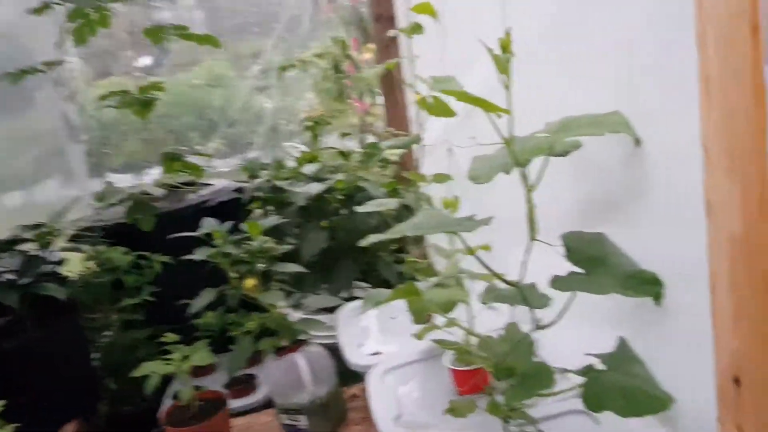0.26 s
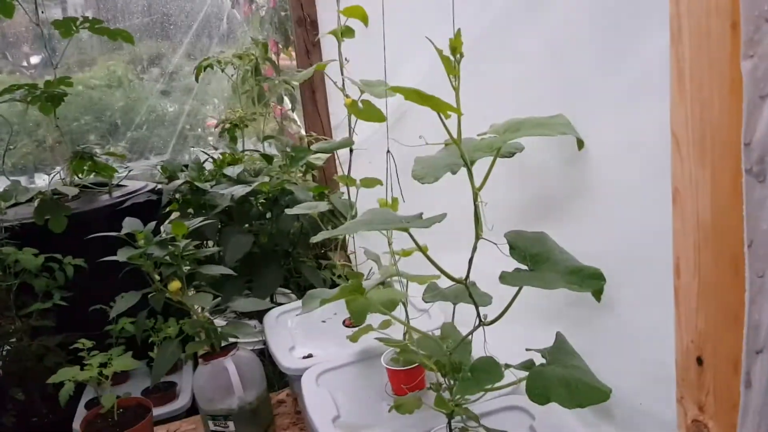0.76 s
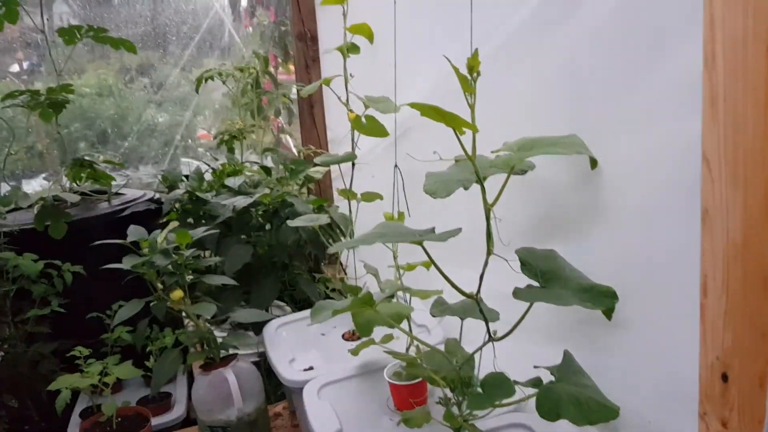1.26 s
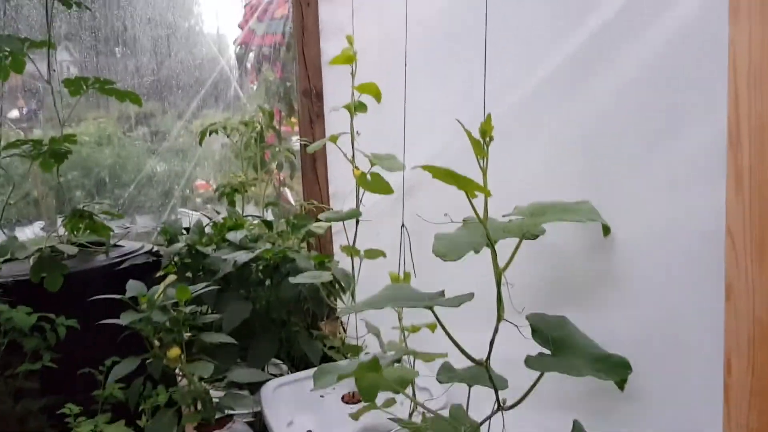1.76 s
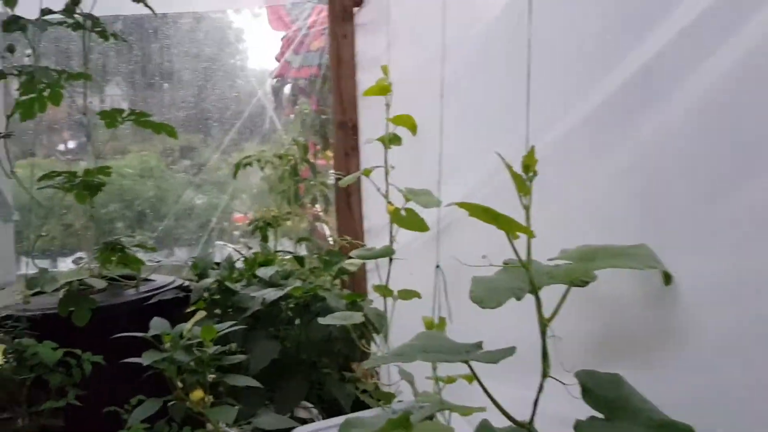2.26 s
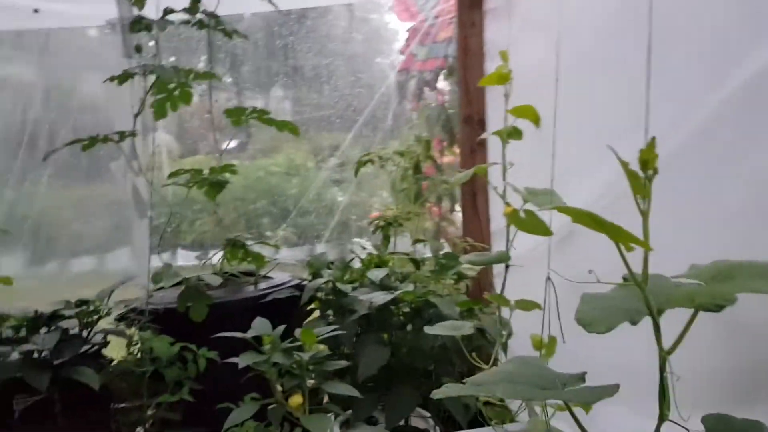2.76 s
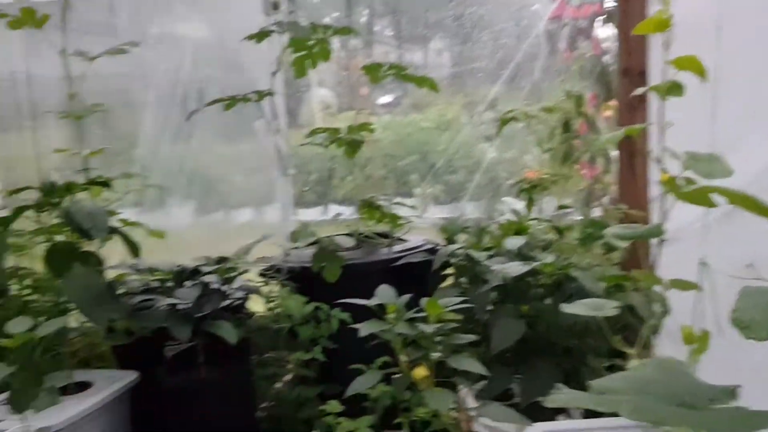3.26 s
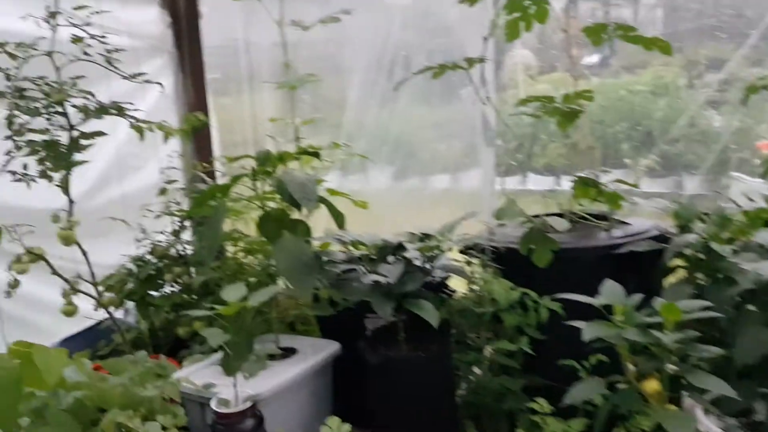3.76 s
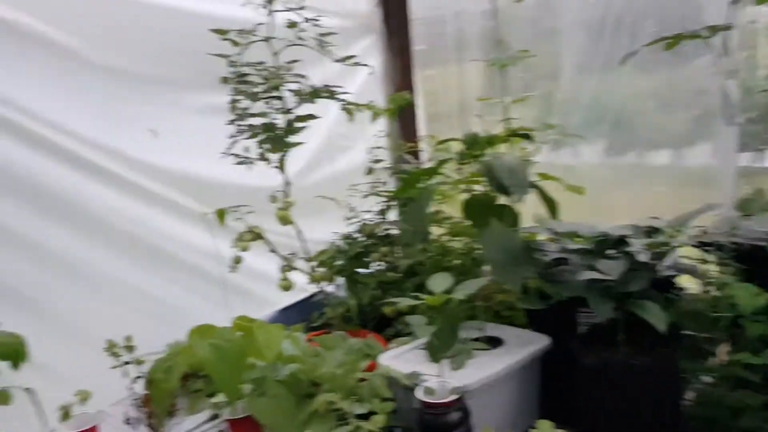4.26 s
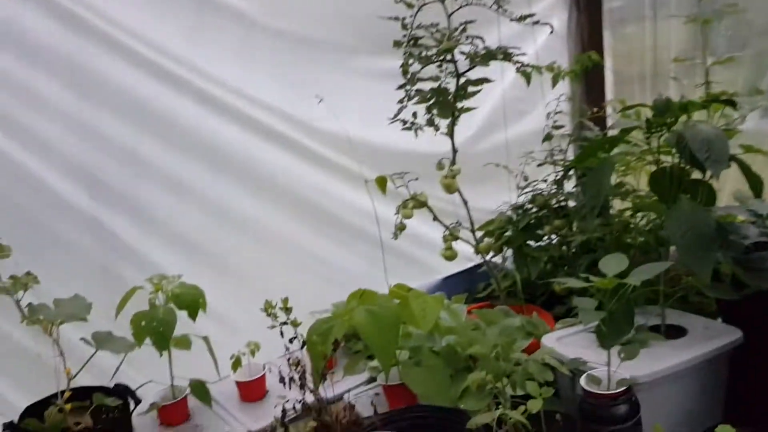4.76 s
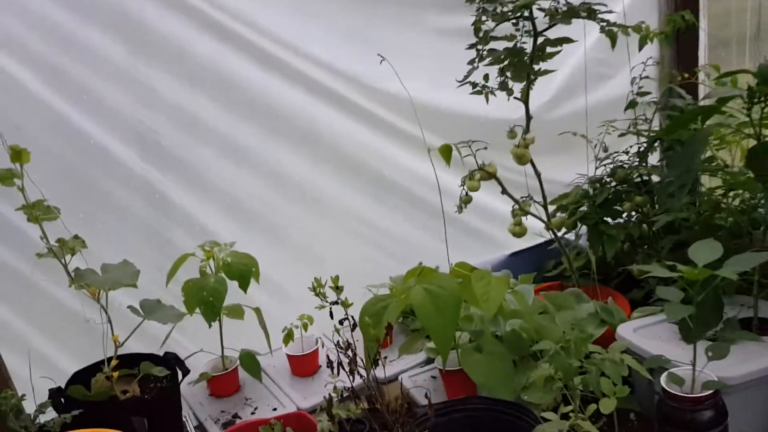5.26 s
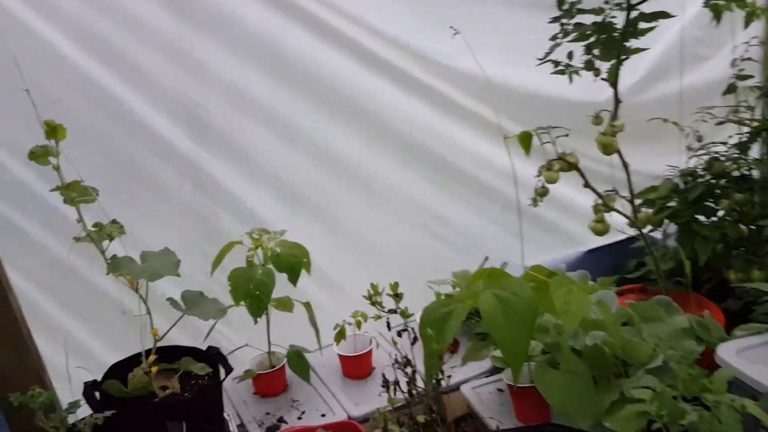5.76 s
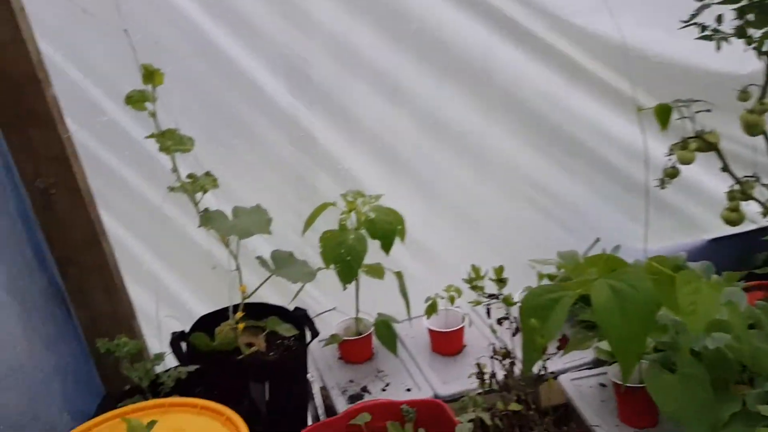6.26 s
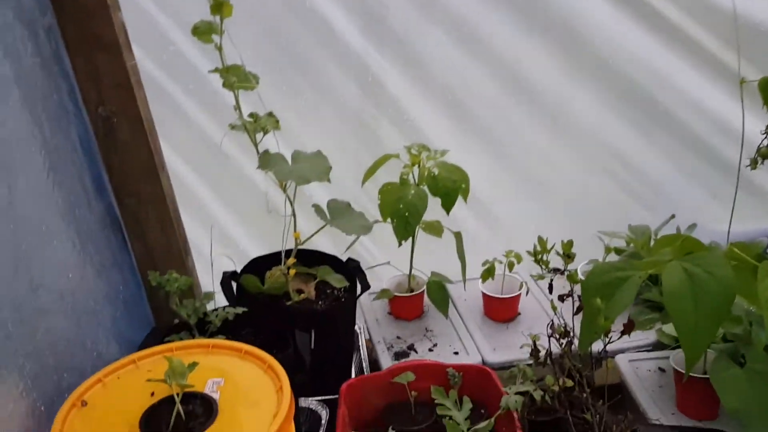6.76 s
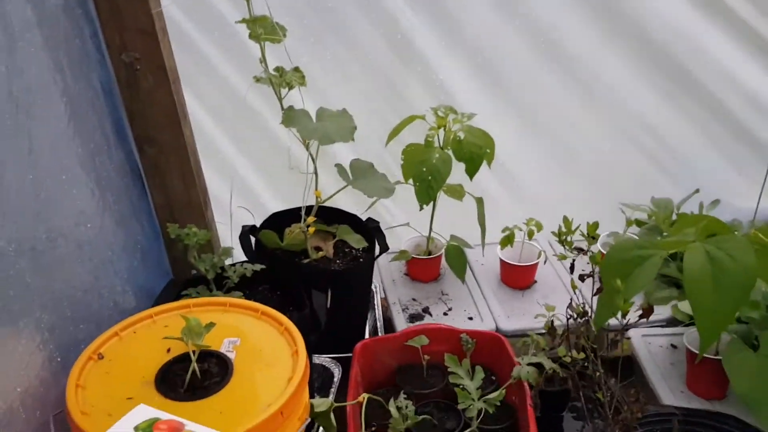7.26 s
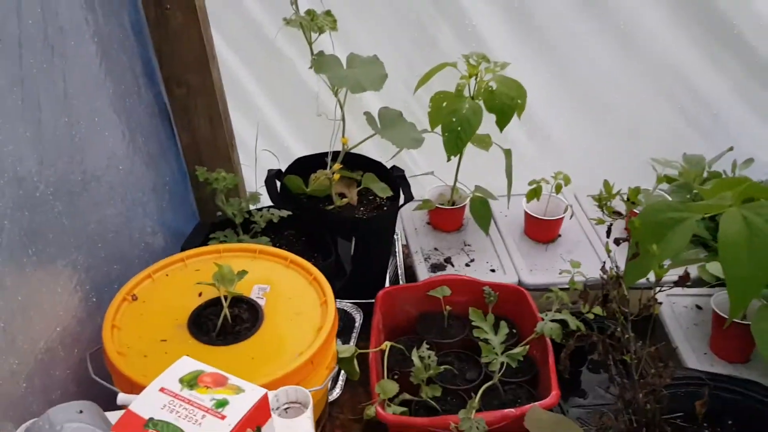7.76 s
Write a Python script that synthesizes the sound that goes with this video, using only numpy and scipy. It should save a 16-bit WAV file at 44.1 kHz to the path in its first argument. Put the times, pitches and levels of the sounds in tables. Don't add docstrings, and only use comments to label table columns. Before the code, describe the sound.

Rain on a small plastic greenhouse, heard inside through a handheld stereo microphone. From 0 s there is continuous soft hiss, fine patter and faint low drumming of the structure, with scattered dry taps. Heavier drops slap the taut sheet at about 1.4 and 2.1 s, each with a short rattling ring. At 2.9 s a sharp double knock hits the housing on the left; from 3.1 to 3.7 s a finger drags over the right side in rapid low, fluttering thuds, then more bumps and a second flutter until about 4.1 s, while strong drops strike at 3.6 and 4.0 s. A quick soft trickle falls at 4.3 s, followed by a dense cluster of bright taps around 4.65 s. Crisp ticks, plips and wet splats continue, with a strong slap at 5.4 s. Small handling clicks come at 6.3 s and 7.1-7.9 s as the tapping thickens to the end at about 8 s.

```python
import sys
import numpy as np
from scipy import signal
from scipy.fft import rfft, irfft, next_fast_len
from scipy.io import wavfile
from scipy.ndimage import uniform_filter1d, map_coordinates

SR = 44100
rng = np.random.default_rng(int(sys.argv[2]) if len(sys.argv) > 2 else 0)


def to_wav(sig):
    pcm = np.clip(np.atleast_2d(sig), -1, 1) * 32767
    pcm = np.round(pcm).astype(np.int16)
    wavfile.write(sys.argv[1], SR, pcm.T)


def natural_amplitude(level_db):
    exponent = np.asarray(level_db, float) / 20
    return 10 ** exponent


N = 352894

# start in seconds, hiss in dB, extra treble in dB, rumble in dB.
SHOWER_LEVELS = [(0.0, -46.5, 8, -47.5), (1.65, -47, 6.5, -49.5), (2.3, -47.5, 7.5, -50),
                 (2.6, -48, 8, -53), (2.9, -46, 10, -49.5), (3.35, -51.5, 8, -47), (3.55, -41.5, 2, -52),
                 (3.85, -43.5, 2.5, -50), (4.21, -45.5, 0, -49), (4.5, -46, 2.5, -50),
                 (5.3, -44, 4.5, -48.5), (5.7, -46, 8, -47), (5.95, -46, 10, -50), (6.3, -46, 8, -46.5),
                 (6.9, -47, 11.5, -48), (7.45, -44, 9, -49), (8.0, -43.5, 6.5, -53)]
TAP_CRISP_DB, TICK_CRISP_DB = 3, 5


def unit(x):
    return x / np.sqrt(np.mean(x ** 2) + 1e-20)


def along(points, hz):
    f, v = np.transpose(points)
    return np.interp(np.log(hz + 1), np.log(f + 1), v)


def curves(rows):
    s, *cols = np.transpose(rows)
    return [np.interp(np.arange(N) / SR, s, c) for c in cols]


def wobble(rate):
    knots = rng.standard_normal(int(N * rate / SR) + 4)
    return map_coordinates(knots, [np.arange(N) * rate / SR])


def filtered(x, response):
    m = next_fast_len(N + 8192)
    return irfft(rfft(x, m) * response(np.fft.rfftfreq(m, 1 / SR)), m)[..., :N]


def low(f, hz):
    return 1 / (1 + 1j * f / hz)


def high(f, hz, q=0.7):
    return -f * f / (hz * hz - f * f + 1j * f * hz / q)


def causal(*spectra):
    hz = np.fft.rfftfreq(2048, 1 / SR)
    cepstrum = irfft(np.log(natural_amplitude(sum(along(points, hz) for points in spectra))))
    cepstrum[1:1024] *= 2
    cepstrum[1025:] = 0
    return irfft(np.exp(rfft(cepstrum)))[:1024]


def rush(patchy_db):
    # frequency in Hz, left-right likeness from 0 to 1.
    likeness = [(60, 0.91), (300, 0.8), (700, 0.27), (1400, 0.0052), (16000, .01)]
    z = signal.stft(rng.standard_normal((2, N)), nperseg=512)[2]
    field = rng.standard_normal(z.shape[1:])
    field = uniform_filter1d(uniform_filter1d(field, size=8, axis=0), size=8, axis=1)
    pair = signal.istft(z * natural_amplitude(patchy_db * unit(field)), nperseg=512)[1][:, :N]

    def mid_side(hz):
        angle = np.arccos(np.clip(along(likeness, hz), -1, 1)) / 2
        return np.array([np.cos(angle), np.sin(angle)])

    mid, side = filtered(pair, mid_side)
    return unit(np.array([mid + side, mid - side]))


def rumble():
    # frequency in Hz, level in dB.
    drumming_colour = [(15, -40), (30, -25), (42, -4.5), (54, -1.5), (124, -3.5), (166, -10), (300, -17),
                       (390, -21.5), (660, -120)]
    level_db = curves(SHOWER_LEVELS)[2] - 0.5 + 0.75 * wobble(4.3)
    return natural_amplitude(level_db) * unit(filtered(rush(patchy_db=1.5), lambda f: natural_amplitude(along(drumming_colour, f))))


def patter(count, spread_db):
    out = np.zeros((2, N))
    for pan, splash, pitch, chance in rng.standard_normal((10, 4)):
        hits = np.zeros(N)
        places = rng.integers(0, N, count)
        hits[places] = natural_amplitude(spread_db * np.minimum(rng.exponential(size=count), 2.8))
        one = drop(-24, 3 * pan, splash_db=-9 + 4 * splash, thud_db=-13.5, hz=1300 * np.exp(0.42 * pitch),
                   crisp_db=TAP_CRISP_DB, chance=chance)
        out += signal.fftconvolve(hits[None], one, axes=1)[:, :N]
    return unit(out)


def shower():
    hiss_db, treble_db, _ = curves(SHOWER_LEVELS)
    swell = natural_amplitude(0.9 * wobble(11))
    rain = natural_amplitude(1) * rush(patchy_db=2.0) + natural_amplitude(-0.23) * patter(count=230, spread_db=4.0)
    treble = filtered(rain, lambda f: abs(high(f, 10240)) ** 2)
    rain = rain + (natural_amplitude(treble_db) - 1) * treble
    return natural_amplitude(hiss_db + 8.5) * swell * rain


def finger():
    # start in seconds, push in dB, click in dB over the push.
    slips = [(3.112, -34, -17), (3.1228, -31, -20), (3.1354, -27, -14), (3.1498, -28, -26),
             (3.1696, -26, -26), (3.1974, -27, -18), (3.2156, -24, -26), (3.2324, -25, -26),
             (3.2494, -23, -21), (3.2658, -22, -26), (3.2808, -21.5, -9.5), (3.297, -21, -28),
             (3.3122, -21, -28), (3.326, -19.5, -28), (3.3406, -21, -28), (3.3597, -24, -26),
             (3.3838, -26, -26), (3.4054, -22, -26), (3.4239, -18.5, -12), (3.4397, -20, -7),
             (3.4543, -20, -26), (3.4696, -21, -19), (3.486, -21, -9), (3.504, -23, -26),
             (3.5203, -23, -17), (3.534, -22, -10), (3.5503, -19.5, -14), (3.5665, -20, -26),
             (3.5864, -23, -18), (3.6156, -24, -26), (3.6335, -21.5, -4), (3.6597, -19.5, -9),
             (3.6778, -20, -10), (3.6958, -21, -22), (3.9012, -20.5, -10.5), (3.917, -24, -8),
             (3.932, -20, -10), (3.946, -19.5, -8.5), (3.9585, -20, -5), (3.971, -20, -7),
             (3.9845, -23, -17), (3.9974, -19, -9), (4.0127, -23, -9)]
    # start in seconds, push in dB, click in dB over the push, direction (1 or -1), port
    touches = [
        (2.9153, -40, 37, 1, 0),
        (2.9173, -16, 3.5, 1, 0),
               (3.7174, -28, -11, -1, 1), (3.78, -20, -5, -1, 1), (3.8077, -21.5, -11, -1, 1),
              (3.8797, -22.5, -3, -1, 1), (4.0342, -25.5, -18, -1, 1), (4.081, -30, -9, -1, 1),
              (4.122, -23, -2, -1, 1), (6.2509, -29, 7.5, 1, 1), (6.267, -32, -3, 1, 1),
              (6.3726, -28, 11, 1, 1), (7.069, -34, 8.5, 1, 1), (7.1937, -32.5, 16, -1, 1),
              (7.208, -27.5, 7, -1, 1), (7.2503, -27.5, 4.5, -1, 1), (7.41, -35, 3, 1, 0),
              (7.6494, -20, 3.5, -1, 1), (7.672, -30, -13, -1, 1), (7.6815, -31, -13, -1, 1),
              (7.691, -35, -13, -1, 1), (5.228, -34, -15, -1, 0), (5.367, -30, -8, -1, 0),
              (5.556, -38, -15, -1, 0), (5.738, -34, -12, -1, 0), (7.805, -30, 7, -1, 1),
              (7.8469, -22, -4, -1, 1), (7.894, -34, -9, -1, 0)]
    push, click = np.zeros((2, 2, N))
    s, db, sharp_db = np.transpose(slips)
    at = np.round(s * SR).astype(int)
    size = natural_amplitude(db + 4.0)
    push[1, at - 25] = -size
    push[1, at - 95] = 0.33 * size
    click[1, at] = size * natural_amplitude(sharp_db + 7.0)
    for s, db, click_db, way, port in touches:
        push[round(port), round(s * SR)] = np.sign(way) * natural_amplitude(db + 3.5)
        click[round(port), round(s * SR)] = -np.sign(way) * natural_amplitude(db + click_db + 6.5)
    edge_hz = np.array([[2500], [1750]])
    floor_hz = np.array([[40], [84]])
    swing = filtered(push, lambda f: natural_amplitude(39.5) * low(f, 235) ** 3 * high(f, 63, q=1.0))
    flick = filtered(click, lambda f: natural_amplitude([[18.5], [25]]) * low(f, edge_hz) ** 4 * high(f, floor_hz))
    return swing + flick


def drop(db, pan_db, splash_db, thud_db, hz, crisp_db, chance):
    t = np.arange(4096) / SR
    noise = rng.standard_normal((4, 2, len(t)))
    dull_db = max(-19 - splash_db, 0)

    near = natural_amplitude(15.5 + 0.3 * (db + 18) - dull_db + crisp_db / 2)
    slap_hz = 800 * (max(hz, 650) / 900) ** (0.24 + 0.074 * crisp_db)
    slap = near * np.cos(2 * np.pi * slap_hz * t + 0.17) * np.exp(-t * slap_hz * 2.25)
    slap = slap * np.clip(t / 0.00007, 0, 1)

    rise = 1 - np.exp(-t / (0.0012 * natural_amplitude(1.5 * dull_db)))
    tail_s = 0.18 * np.exp(0.24 * chance)
    fade = (natural_amplitude(-60 * t / 0.045) + 0.47 * natural_amplitude(-60 * t / tail_s)) * rise
    fade = fade * natural_amplitude(-0.32 * max(db + 25.0, 0) - crisp_db)

    clumps = natural_amplitude(3 * np.repeat(rng.standard_normal((2, 128)), 32, 1))
    spot = np.r_[2.2, noise[3, 1, :63] * natural_amplitude(-60 * t[:63] / 0.005)]
    rattle_db = -5.0 - dull_db / 2 + 0.59 * min(splash_db + 15, 0)
    rattle = signal.lfilter(spot / np.linalg.norm(spot), [1, -0.6], noise[0] * clumps * fade)
    rattle = natural_amplitude(rattle_db) * rattle

    ring_noise = (noise[2] + 0.1 * noise[2, 0]) * fade
    ring = natural_amplitude(8.0) * signal.lfilter(*signal.iirpeak(hz, 5.5, SR), ring_noise)

    decay_rate = max(hz, 1400 * (crisp_db > 0)) / 4.2 * natural_amplitude(crisp_db / 2)
    plop = np.sin(2 * np.pi * hz * t) * np.exp(-t * decay_rate) * (1 - np.exp(-t / (0.0004 * natural_amplitude(dull_db))))
    plop = natural_amplitude(-4 + 0.6 * dull_db + 2 * crisp_db) * plop

    spray = natural_amplitude(-60 * t / 0.0071) + natural_amplitude(-11.0) * natural_amplitude(-60 * t / 0.21)
    splash = signal.lfilter([0.49, -0.59, -0.58, 0.51], 1, noise[1] * spray)
    splash = natural_amplitude(splash_db + 18.0) * splash

    thump = noise[3, 0] * natural_amplitude(-60 * t / 0.058) * (1 - np.exp(-t / 0.00074))
    boom = natural_amplitude(thud_db + 19.5) * signal.lfilter(*signal.iirpeak(240, 0.9, SR), thump)
    sides = natural_amplitude([[pan_db / 2], [-pan_db / 2]])
    return natural_amplitude(db) * sides * (slap + rattle + ring + plop + splash + boom)


def trickle(count):
    # loudest drop in dB, first ring in Hz, last ring in Hz.
    db, first_hz, last_hz = (-28, 1800, 700)
    start, end = (4.298, 4.342)
    u = (np.arange(count) + rng.random(count)) / count
    return [(start + (end - start) * k, db - 7 * (2 * k - 1) ** 2, 1.5, -20.5, -22,
             first_hz * (last_hz / first_hz) ** k, 0) for k in u]


def near_drops():
    # start in seconds, slap in dB,
    # splash in dB over the slap, thud in dB over the slap, ring of the struck spot in Hz.
    slaps = [(0.2426, -25, -8.5, -1, 820), (0.678, -23.5, -23, -9, 657), (1.3618, -17, -15, -11.5, 668),
             (1.5157, -26.5, -13, -28, 900), (2.1436, -18.5, -10.5, -10.5, 730),
             (2.1809, -24.5, -16, -9, 920), (3.249, -24, -11, -14, 1240), (3.5719, -14.5, -17, -11, 754),
             (3.7658, -18, -14, -3, 1000), (3.9805, -14.5, -8, -12, 900), (4.097, -16, -7, -6.5, 825),
             (4.2417, -26.5, -3, -9, 1890), (4.643, -17.5, -10.5, -12, 1420),
             (4.697, -18.5, -10, -0.5, 1090), (5.233, -19, -12, -4.5, 740), (5.245, -26.5, -7, -4.5, 1040),
             (5.3657, -16.5, -12, -5.5, 1110), (5.877, -24, -4, 3.5, 374), (6.7623, -26, -6.5, -8.5, 1320),
             (7.0522, -22.5, -16.5, -3.5, 1810), (7.3214, -20, -16, -11, 1060),
             (7.6408, -27.5, -11, -2, 3000), (7.889, -23.5, -10, -9, 680)]
    # start in seconds, slap in dB,
    # splash in dB over the slap, ring in Hz.
    splats = [(1.5152, -40.5, 3.5, 6000), (3.3493, -44, 8, 5000), (7.024, -46, 4, 1200),
              (7.111, -35.5, -5, 900), (7.524, -34, 1, 3500), (.331, -31.5, -5.5, 900),
              (2.794, -34.5, -3.5, 2200), (6.07, -33.5, -5, 1800), (6.9215, -36, -5, 4700),
              (2.8228, -30.5, -4, 1110), (3.1361, -30.5, -3.5, 980), (3.1982, -35.5, -5, 335),
              (3.28, -42.5, 4.5, 328), (3.394, -29, 3.5, 1750), (4.655, -23.5, -16, 950),
              (4.8307, -34.5, -6, 1130), (5.0132, -30.5, -3.5, 1670), (5.0385, -32.5, -5, 2270),
              (5.1181, -45, 18.5, 2300), (5.4215, -29.5, -9, 1810), (5.4952, -32, -1, 1780),
              (5.9894, -29.5, -4.5, 1280), (6.0444, -34.5, -1.5, 654), (6.3512, -29.5, -4, 1610),
              (6.5664, -30, -1, 1570), (6.6239, -36.5, 0, 826), (6.706, -49.5, 13, 1610),
              (6.86, -34.5, 0.5, 1550), (7.0644, -29, -5, 533), (7.0926, -27.5, -4.5, 1010),
              (7.3322, -29, -5, 1460), (7.5748, -30, 2, 2470), (7.8675, -40, 4, 2440)]
    # start in seconds, slap in dB, left over right in dB,
    # splash in dB over the slap, ring in Hz.
    plops = [(0.29, -37, 5, -20, 1050), (0.95, -39, 2, -22, 1400), (1.6133, -36, 6, -18, 1270),
             (2.4949, -27, -1.5, -22, 1370), (3.8312, -22.5, 0.5, -14, 960), (4.3143, -21, 0, -32, 1280),
             (3.9003, -29.5, -1.5, -11, 740), (2.309, -36, -2, -21, 1930), (2.1, -42.5, 0, -22, 800),
             (6.5, -36.5, 0, -17, 2200), (4.6425, -17.5, 1.5, -26, 397), (5.168, -32.5, 4, -24, 1170),
             (7.455, -31.5, 4, -8, 2400), (6.2, -41, 4, -14, 2140)]
    # start in seconds, slap in dB, left over right in dB, ring in Hz.
    taps = [(0.0348, -36.5, 1.5, 1000), (.752, -33, 1, 590), (5.7577, -34, -1, 1930),
            (0.8033, -30.5, 1.5, 820), (0.8292, -32, -4, 940), (1.246, -30, 2.5, 900),
            (1.815, -37, 11.5, 900), (1.8446, -29.5, 2, 1320), (2.6867, -31, 10.5, 1140),
            (2.848, -29, 3, 1050), (3.153, -31, 4, 785), (6.829, -33.5, 6, 710), (4.6185, -32, -6, 2490),
            (4.742, -31, 6, 2600), (4.8725, -31.5, 6, 1400), (4.966, -27.5, 5, 1210),
            (4.9939, -24.5, 3, 1380), (5.334, -23.5, 5.5, 2600), (5.4337, -31.5, -5, 1900),
            (5.466, -33, 7, 1100), (5.565, -31, 6.5, 2400), (5.7391, -28.5, 3.5, 2280),
            (6.4338, -29.5, -2.5, 1880), (6.475, -30, 3, 1860), (7.379, -27.5, 4, 2270),
            (7.4003, -24, -1.5, 710), (7.509, -31, 3, 2020), (7.5314, -28.5, 11.5, 1250),
            (7.5538, -28.5, -3.5, 1600), (7.9384, -28, 3, 2440)]
    # start in seconds, slap in dB,
    # splash in dB over the slap, ring in Hz.
    ticks = [(0.396, -35, -20, 1190), (0.9135, -35.5, -6, 2020), (0.9366, -37, -11, 2240),
             (1.0747, -42, -4, 930), (1.175, -43, -11, 1780), (1.3156, -32, -13, 1680),
             (1.3614, -28, -10, 4030), (1.5768, -34, -6, 2100), (1.706, -39, -14, 1260),
             (1.8206, -41, -11, 714), (1.853, -36, -17, 530), (1.87, -35, -12, 830),
             (2.1653, -30.5, -6, 517), (2.3826, -35.5, -10, 720), (2.4266, -35.5, -15, 1820),
             (2.517, -35, -11, 2470), (2.5523, -38.5, -7, 1410), (2.703, -37, -16, 1010),
             (3.3054, -46, 8, 6500), (3.8159, -29, -13, 1180), (4.0175, -37, 3, 1000),
             (4.2276, -41, 0, 1200), (4.379, -39, -9, 2430), (4.4644, -45, -17, 2360),
             (4.6435, -20, -8, 2830), (4.652, -24, -10, 6400), (4.8003, -27.5, -8.5, 2730),
             (4.9413, -40, 0, 790), (4.9978, -30.5, -13, 1250), (5.0514, -33, -17, 1250),
             (5.3118, -40.5, -12, 710), (5.334, -34, -5, 3100), (5.5866, -35.5, -11, 627),
             (5.5982, -29.5, -12, 2780), (5.6136, -40, -9, 2380), (5.6543, -41, -5, 1600),
             (6.0007, -40, 2, 610), (6.102, -49, 10, 780), (6.227, -33, -11, 520), (6.3422, -37, -12, 620),
             (6.4135, -39, -12, 520), (6.4493, -36, -12, 1120), (6.4972, -34, -11, 610),
             (6.625, -41, 5, 820), (6.659, -50, 2, 2000), (6.896, -40, 1, 1000), (7.1656, -41, 5, 6300),
             (7.4284, -32, -8, 1230), (7.9894, -37, -5, 1360)]
    # start in seconds, slap in dB, left over right in dB, ring in Hz.
    specks = [(.378, -40, 3, 1900), (.562, -38, 4, 2100), (.581, -35, 1, 420), (1.056, -44, 2, 400),
              (3.5106, -36, 4, 2300), (4.364, -30, -2.5, 12000), (4.432, -38, 4, 5000),
              (4.497, -39, 3, 1500), (4.552, -34, 3, 11500), (4.602, -34, 4, 2500), (5.209, -37, 3, 2300),
              (5.314, -37, 3, 1400), (7.3044, -36, 4, 2200), (7.415, -35, 4, 2800),
              (7.4431, -35, 3.5, 2400), (7.491, -36, 4, 4000), (7.6851, -37, 6, 2800),
              (7.7285, -37, 3.5, 2000), (7.755, -38, 4, 5000), (7.767, -35, 6, 3000),
              (7.7994, -30, 6.5, 3200), (7.8283, -35, 5, 4500), (7.904, -36, 5, 3200),
              (7.889, -28, 5, 3000), (5.3661, -22, 3.5, 1510), (7.3214, -26, 3, 1400),
              (2.715, -33.5, 4, 1300), (2.675, -35, 5, 1500), (1.172, -39, 2, 560), (4.068, -34, 2, 1300),
              (4.089, -32, 2, 1500), (3.281, -33, 3, 1100), (4.68, -33, -2, 300)]
    tick_thud_db = -29
    every = [(s, db, 2.5, splash, thud, hz, 0) for s, db, splash, thud, hz in slaps]
    every += [(s, db, 3, splash, -9, hz, 0) for s, db, splash, hz in splats]
    every += [(s, db, pan, splash, -14.5, hz, 0) for s, db, pan, splash, hz in plops]
    every += [(s, db, pan, -11, -27, hz, TAP_CRISP_DB) for s, db, pan, hz in taps]
    every += [(s, db, 3, splash, tick_thud_db, hz, TICK_CRISP_DB) for s, db, splash, hz in ticks]
    every += trickle(count=11)
    every += [(s, db, pan, -14, tick_thud_db, hz, TICK_CRISP_DB) for s, db, pan, hz in specks]
    out = np.zeros((2, N + SR))
    for s, db, pan_db, *colour in every:
        sound = drop(db, pan_db, *colour, rng.standard_normal())
        start = round(s * SR) - 8
        late = round(np.clip(5 + 1.5 * pan_db, -9, 16))
        out[0, start:][:sound.shape[1]] += sound[0]
        out[1, start + late:][:sound.shape[1]] += sound[1]
    return out[:, :N]


def ports(air):
    # frequency in Hz, left in dB, right in dB.
    first_colour = [(253, -4.5, -9.5), (590, -4, -8.5), (900, -6, -9.5), (2100, -3, -5), (2540, -4, -6.5),
                    (3120, -8.5, -10), (4210, -10.5, -10.5), (5150, -15, -22), (6350, -14.5, -26.5),
                    (7640, -17.5, -31.5), (9660, -30, -21), (11100, -29, -23), (13040, -28.5, -25),
                    (14400, -28, -41)]
    # frequency in Hz, left in dB, right in dB.
    later_colours = [
        [(400, -0.5, 2.5), (1730, -1.1, -1), (2600, 0, 5.5), (3530, 2, -4), (5500, 4.5, 6), (7900, -1.5, -0.5),
         (12600, 6, 1), (14900, -4, 8)],
        [(400, 0, 3.5), (1800, -0.6, -1.7), (3240, 3, 2.5), (4000, 3.5, -4), (5200, 7, 3.5), (7900, -2.5, 2.5),
         (12500, 3.5, 3), (14500, -4, 3.5)],
    ]
    # time in seconds, grip number.
    grip_moves = [
        (0, 0),
        (3.0, 0),
        (3.5, 1),
        (5.6, 1),
        (5.9, 2),
        (8.1, 2),
    ]
    grip, = curves(grip_moves)
    out = np.zeros((2, N))
    for k, change in enumerate([[(1, 0, 0)]] + later_colours):
        share = np.sqrt(np.clip(1 - abs(grip - k), 0, 1))
        for c in range(2):
            end = (16500, first_colour[-1][1 + c] - 5)
            colour = [(40, -8.0)] + [(row[0], row[1 + c]) for row in first_colour] + [end]
            response = causal(colour, [(row[0], row[1 + c]) for row in change])
            out[c] += signal.fftconvolve(air[c] * share, response)[:N]
    return out


def shaded(x):
    # time in seconds, treble in dB.
    palm = [(0, -3.5), (3.3, 0.5), (3.5, -10), (4.0, -12), (4.25, -1), (4.47, 0), (4.56, 6), (4.8, 2.5),
            (5.6, 1.5), (7.1, 0), (7.4, -11), (8.0, -11)]
    top = filtered(x[0], lambda f: 1 / (1 + (12000 / (f + 1)) ** 14) + 0.67 * np.exp(-((f - 7000) / 1300) ** 2))
    return x + np.array([(natural_amplitude(curves(palm)[0]) - 1) * top, 0 * top])


def scene():
    return shaded(ports(shower() + near_drops())) + rumble() + finger()


def roll_off(x):
    return signal.sosfilt(signal.butter(12, 16520, fs=SR, output="sos"), x)


def record(dry):
    x = filtered(dry, lambda f: abs(high(f, 29.0)) ** 2)
    x = x / (1 + abs(x / 1.02) ** 8) ** (1 / 8)
    return roll_off(x)


dry = scene()
out = record(dry)
to_wav(out)
```